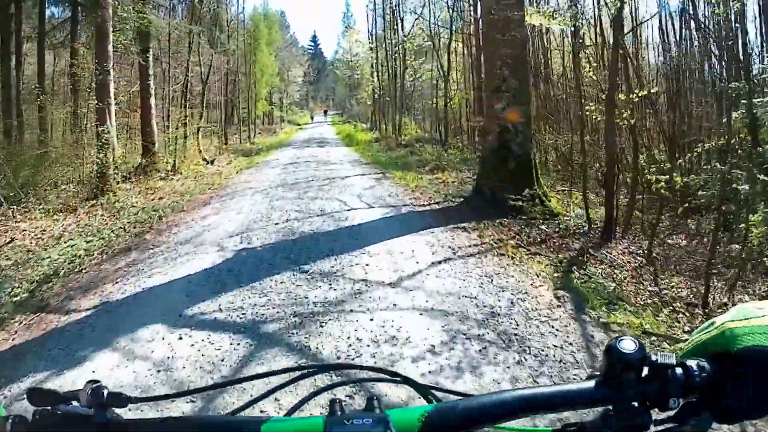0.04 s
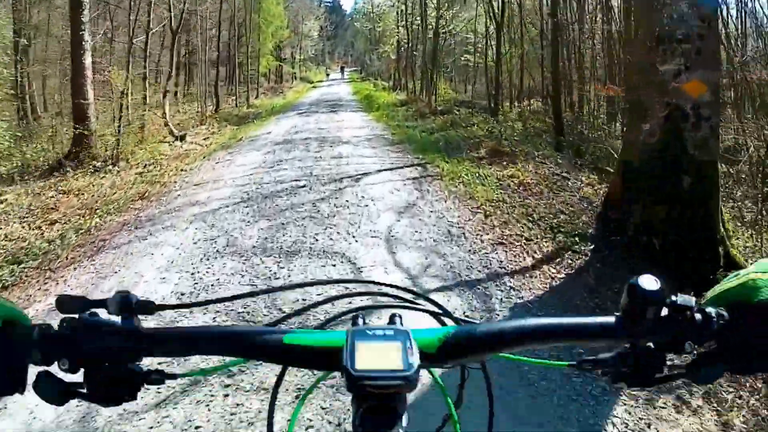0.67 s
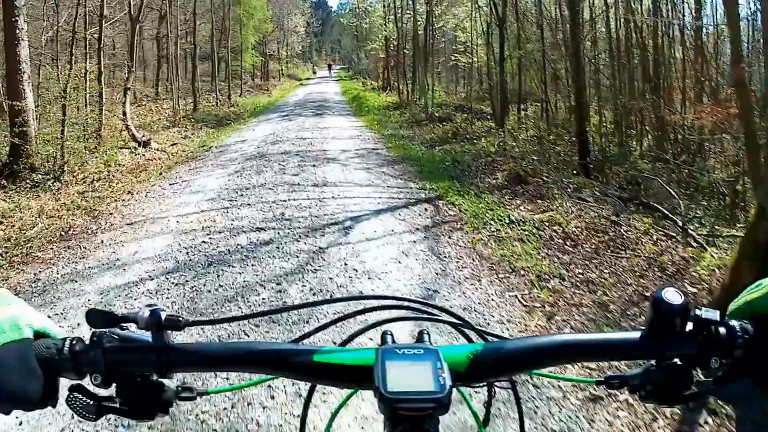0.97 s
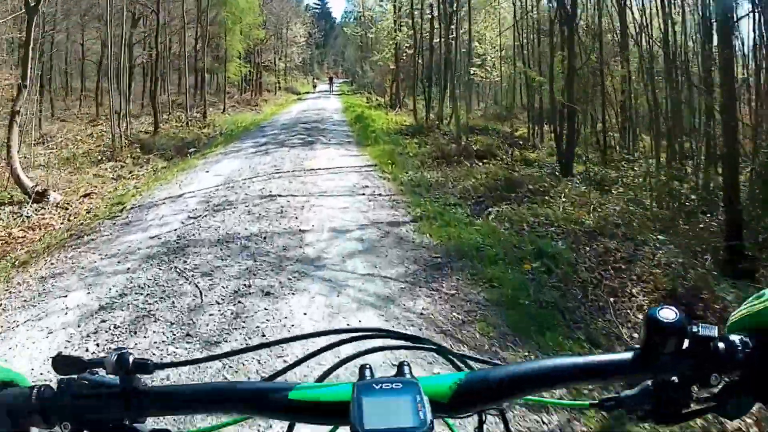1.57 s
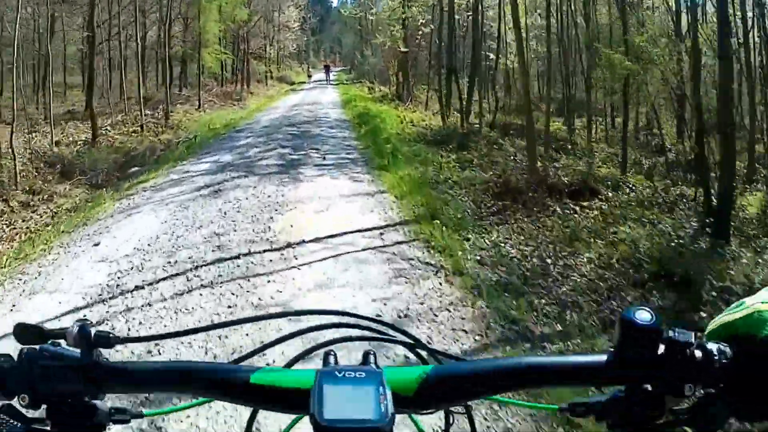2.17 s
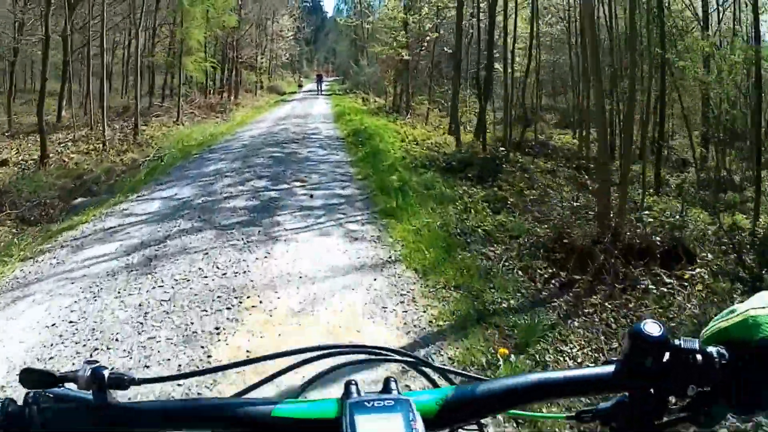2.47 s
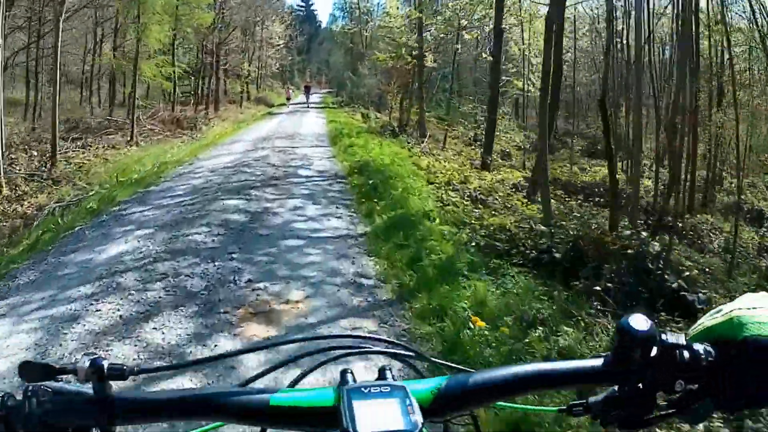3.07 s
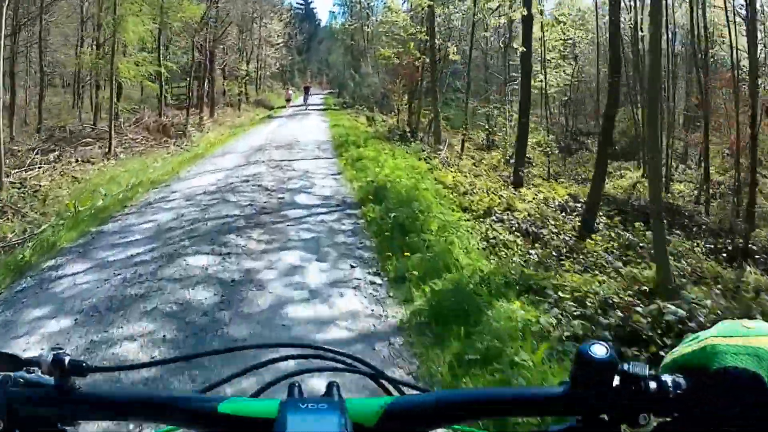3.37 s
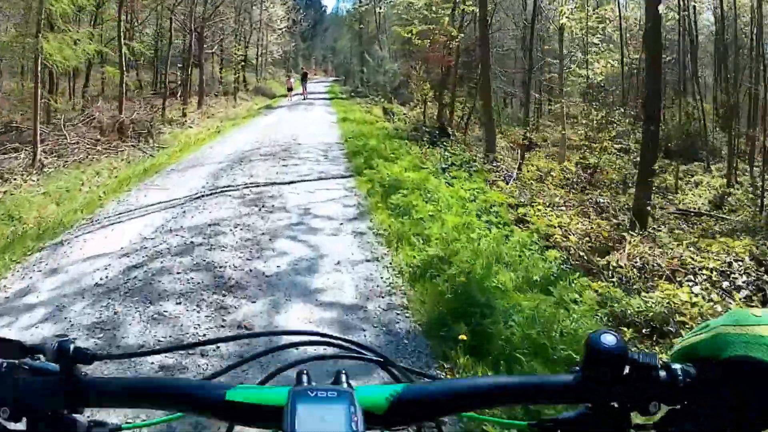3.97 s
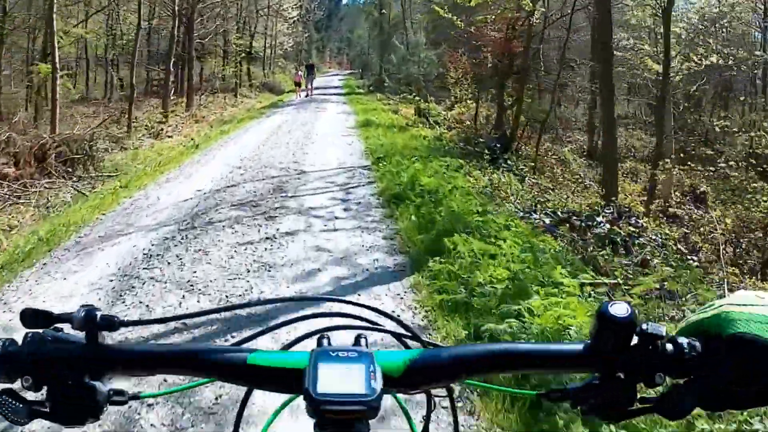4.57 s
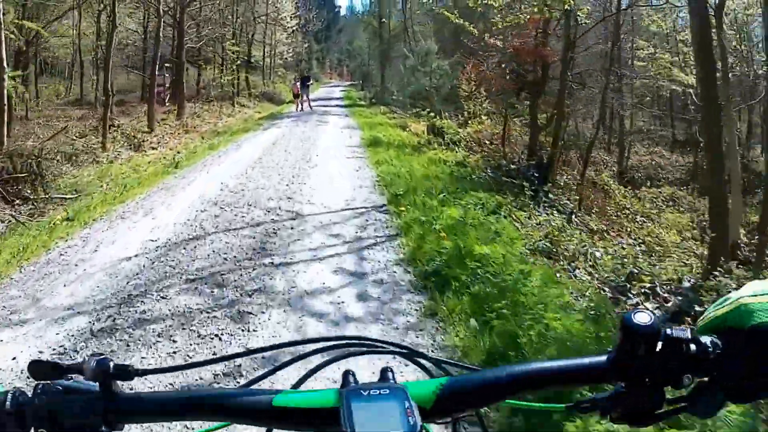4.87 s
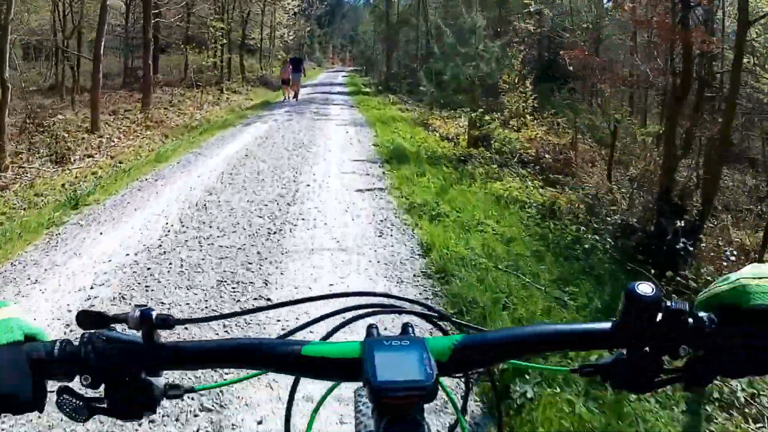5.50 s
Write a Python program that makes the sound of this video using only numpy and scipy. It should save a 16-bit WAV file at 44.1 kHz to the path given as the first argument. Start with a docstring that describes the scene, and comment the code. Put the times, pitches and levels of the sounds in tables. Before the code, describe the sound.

Muffled tyres crackle over loose stones as a bike clatters and thumps over bumps, under fluttering wind rumble.

```python
"""Mountain bike on gravel

Heard from a camera in a closed case on the rider. The tyres crunch over loose stones, most of all
in the first second, and drone faintly while wind buffets the case. Stones and bike parts knock,
the case rings with each blow, and bumps thump the frame. The case wall shuts out the treble;
one hard jolt overloads the microphone."""
import sys
import numpy as np
from scipy import signal
from scipy.fft import rfft, irfft
from scipy.io import wavfile
from scipy.ndimage import uniform_filter1d

SR = 44100
rng = np.random.default_rng(int(sys.argv[2]) if len(sys.argv) > 2 else 0)


def log_audio(samples):
    """Write samples as a 16-bit WAV file to the path given in sys.argv[1]."""
    # one column per channel
    frames = np.atleast_2d(samples).T
    # limit to full scale, then quantise
    limited = np.clip(frames, -1, 1)
    pcm = np.round(limited * 32767).astype(np.int16)
    wavfile.write(sys.argv[1], SR, pcm)


N = 244314
TIME = np.arange(N) / SR

# gravel under the tyres, loose at first, then packed: (time [s], crunch [dB], crackle [dB])
GRAVEL_BED = [(0.0, -28.5, -40.5), (0.43, -31, -38.5), (0.88, -31, -42), (1.19, -37, -43),
              (1.46, -34.5, -41.5), (2.48, -38, -45), (2.92, -37, -43), (3.95, -35.5, -43.5),
              (4.18, -34.5, -42), (4.46, -35.5, -45.5), (5.01, -37, -42.5), (5.54, -34, -40.5)]
# ring of the camera case and its mount: (pitch [Hz], level [dB], t60 [s])
CASE_RING = [(475, -20, .06), (610, -14, .04), (780, -17.5, .07), (930, -24, .035), (1160, -20, .02),
             (1750, -33, .018), (2200, -29, .016), (2550, -29, .014)]
STONE_LOW_HZ, STONE_HIGH_HZ, STONE_RESONANCE_DB = 550, 2560, 1.5  # clack of the small stones


def amp(db):
    """Decibels to gain."""
    return 10 ** (np.asarray(db) / 20)


def unit(x):
    """Scales to rms 1."""
    return x / np.sqrt(np.mean(x ** 2) + 1e-20)


def curve(rows, column=1):
    """A table column as an envelope, joined by straight lines in time."""
    rows = np.asarray(rows)
    return np.interp(TIME, rows[:, 0], rows[:, column])


def add(mix, start_s, sound):
    """Mixes a sound in at its start time."""
    part = mix[max(round(start_s * SR), 0):][:len(sound)]
    part += sound[:len(part)]


def response(spectrum, treble_db=0, pitch_hz=1000, resonance_db=0, width_hz=240, size=4096):
    """Causal impulse response of a spectrum, with a treble shelf and one resonance."""
    hz = np.abs(np.fft.fftfreq(size, 1 / SR)) + 1
    point_hz, point_db = np.transpose(spectrum)
    db = np.interp(np.log(hz), np.log(point_hz), point_db)
    db += treble_db * np.interp(hz, [700, 2200], [0, 1])
    db += resonance_db / (1 + (2 * (hz - pitch_hz) / width_hz) ** 2)
    db -= 40 * np.log2(np.clip(hz / point_hz[-1], 1, 2))  # roll off above the last point
    minimum_phase = np.exp(np.conj(signal.hilbert(np.log(amp(db)))))
    return np.fft.ifft(minimum_phase).real


def colour(x, spectrum):
    """Equalises x with a spectrum."""
    return signal.fftconvolve(x, response(spectrum))[:N]


def steady(x, size):
    """Rides the gain to hold rms near 1 over stretches of size samples."""
    power = uniform_filter1d(uniform_filter1d(x ** 2, size), size // 2)
    return x / np.sqrt(power + 1e-12)


def wander(hz):
    """Smooth random drift of rms 1, moving at rates up to about hz."""
    bin_hz = np.fft.rfftfreq(N, 1 / SR)
    return unit(irfft(rfft(rng.standard_normal(N)) / (1 + (bin_hz / hz) ** 4), N))


def grains(per_s, spread_db, limit):
    """Random clicks of either sign: many small, a few large."""
    sizes = amp(spread_db * np.minimum(rng.exponential(1, N), limit))
    return unit(sizes * rng.choice([-1, 1], N) * (rng.random(N) < per_s / SR))


def pebbles(low_hz, high_hz, decay_cycles, per_s, spread_db=1.5, count=18):
    """Stones of many sizes, each size clicking at random with its own brief pitch."""
    out, t = np.zeros(N), np.arange(SR // 25) / SR
    for hz in np.geomspace(low_hz, high_hz, count):
        clack = np.sin(2 * np.pi * hz * t) * np.exp(-hz * t / decay_cycles)
        clicks = grains(per_s / count, spread_db, limit=4.8)
        out += np.sqrt(hz) * unit(signal.oaconvolve(clicks, clack)[:N])
    return unit(out)


def patchy(x, depth_db=2.1):
    """The mix of stone sizes keeps changing: narrow bands swell and fade, each on its own."""
    bands = signal.stft(x, nperseg=512, noverlap=384)[2]
    swell = uniform_filter1d(rng.standard_normal(bands.shape), size=3, axis=0)  # smooth in pitch
    swell = uniform_filter1d(swell, size=16, axis=1)  # and in time
    return signal.istft(bands * amp(depth_db * unit(swell)), nperseg=512, noverlap=384)[1][:N]


def gravel(crunch_db=1, crackle_db=-3, clump_db=1.1, snap_share=0.82):
    """Tyres shift gravel in clumps of bursts: stones clack low, grit ticks high, both snap dryly."""
    # coarse stones grinding together: (frequency [Hz], level [dB])
    crunch_eq = [(100, -13), (280, -3.5), (480, -4.5), (600, -0.5), (740, 0.5), (950, -2), (1100, -8),
                 (1250, -6.5), (1550, -16), (2000, -40), (3000, -40)]
    # fine grit snapping: (frequency [Hz], level [dB])
    crackle_eq = [(500, -11.5), (1200, 0), (1700, 1.5), (2250, -0.5), (2480, -6.5), (2650, -12),
                  (3000, -20), (3200, -21.5), (3500, -36.5), (4000, -32.5)]
    bed_db = curve(GRAVEL_BED)
    burst_db = np.interp(bed_db, [-36, -30], [.5, 1.9])  # loose gravel slips in deeper bursts
    clumps = amp(clump_db * wander(hz=30) + burst_db * wander(hz=130))
    snaps = np.sqrt(snap_share) * grains(per_s=2100, spread_db=3.9, limit=4)
    coarse = np.sqrt(1 - snap_share) * pebbles(276, 1742, decay_cycles=3.17, per_s=2600)
    fine = np.sqrt(1 - snap_share) * pebbles(948, 3990, decay_cycles=3.2, per_s=1300)
    crunch = steady(colour((coarse + snaps) * clumps, crunch_eq), size=4500)
    crackle = steady(colour((fine + snaps) * clumps, crackle_eq), size=4500)
    crunch *= amp(bed_db + crunch_db)
    crackle *= amp(curve(GRAVEL_BED, column=2) + crackle_db)
    return patchy(crunch + crackle)


def tyre_drone(pitch_hz=254, width_hz=26, waver=.03):
    """The road shakes one low tyre resonance: a blurred tone that wavers as the load shifts."""
    # swells on rough patches: (time [s], level [dB])
    swells = [(0, -45), (0.17, -35.5), (0.33, -40.5), (0.7, -47.5), (1.14, -43.5), (1.45, -48),
              (1.92, -40.5), (2.16, -37), (2.28, -52), (2.48, -34.5), (2.63, -42), (3.24, -42),
              (3.58, -40.5), (3.79, -34), (4.0, -42.5), (4.46, -42), (4.9, -42), (5.21, -39), (5.54, -41.5)]
    hz = np.fft.fftfreq(N, 1 / SR)
    road = rng.standard_normal(N) + 1j * rng.standard_normal(N)
    shake = np.fft.ifft(np.fft.fft(road) / (1 + (hz / (width_hz / 2)) ** 4))
    cycles = np.cumsum(pitch_hz * (1 + waver * wander(hz=6))) / SR
    tone = (shake * np.exp(2j * np.pi * cycles)).real
    return steady(tone, size=9000) * amp(curve(swells))


def wind(flutter_db=-4, lumps_db=3, flicker_db=1):
    """Eddies push on the case: large ones make a lumpy rumble, small ones flutter above it."""
    # bed of airflow over the case: (time [s], level [dB])
    airflow = [(0, -31.5), (0.33, -37.5), (0.5, -31), (1.2, -27), (1.4, -33.5), (2.22, -32.5),
               (2.42, -29.5), (3.3, -29), (3.55, -29), (4.3, -28), (4.95, -25.5), (5.2, -29.5),
               (5.54, -26.5)]
    # gusts on top of it: (centre [s], length [s], rumble [dB], flutter [dB])
    gusts = [(0.546, 0.2, -25, -29), (0.786, 0.083, -23, -45.5), (1.18, 0.12, -31, -35),
             (2.049, 0.3, -28, -30.5), (2.532, 0.097, -25, -39), (3.222, 0.19, -25.5, -54.5),
             (3.365, 0.28, -30, -32.5), (4.365, 0.12, -23.5, -37), (4.575, 0.074, -25.5, -30),
             (4.86, 0.17, -28.5, -38), (5.533, 0.14, -28, -30.5)]
    # large eddies: (frequency [Hz], level [dB])
    rumble_eq = [(2, -53), (11, -0.5), (25, 5.5), (50, 1), (80, -6), (120, -17), (250, -52.5)]
    # small eddies: (frequency [Hz], level [dB])
    flutter_eq = [(30, -23), (70, -4.5), (100, -1), (140, -2), (190, -8.5), (310, -10.5), (450, -15),
                  (800, -26.5), (2000, -45)]
    large, small = rng.standard_normal((2, N))
    air_db = curve(airflow)
    rumble_power = amp(air_db + lumps_db * wander(hz=11)) ** 2
    flutter_power = amp(air_db + flutter_db + flicker_db * wander(hz=9.9)) ** 2
    for centre_s, length_s, low_db, high_db in gusts:
        arch = np.cos(np.pi * np.clip((TIME - centre_s) / length_s, -.5, .5))
        rumble_power += (amp(low_db) * arch) ** 2
        flutter_power += (amp(high_db) * arch) ** 2
    rumble = steady(colour(large, rumble_eq), size=3600) * np.sqrt(rumble_power)
    flutter = steady(colour(small, flutter_eq), size=2600) * np.sqrt(flutter_power)
    return rumble + flutter


def case_ring(landing, detune=0.025, place_db=3.5):
    """The case rings after a blow; where it lands decides which modes speak."""
    t = np.arange(SR // 8) / SR
    hz, db, t60 = np.transpose(CASE_RING)[:, :, None]
    pitch_draw, level_draw = landing[:, :, None]
    decays = amp(db + place_db * level_draw - 60 * t / t60)
    modes = decays * np.sin(2 * np.pi * hz * (1 + detune * pitch_draw) * t)
    contact = np.hanning(24)  # the contact time softens the attack
    return np.convolve(modes.sum(0), contact / contact.sum())


def knock(peak_db, treble_db, ring_db, pitch_hz, resonance_db, landing):
    """One pitched clack, then the ring of the case; a short, hard contact has more treble."""
    # body of the clack: (frequency [Hz], level [dB])
    clack_eq = [(60, -12.5), (300, -18), (600, -10.5), (850, -2), (1200, -0.5), (1600, -7), (2250, -7.5),
                (2700, -21.5), (3300, -29), (3900, -70)]
    clack = -response(clack_eq, treble_db, pitch_hz, resonance_db)
    sound = amp(ring_db) * case_ring(landing)
    add(sound, 0, clack / np.abs(signal.hilbert(clack)).max())
    return amp(peak_db) * sound


def knocks(spray_count=4, spray_s=0.022, spray_db=-13):
    """Clacks that stand out, most from stones and rattling parts, each trailed by a fine spray."""
    # accents: (time [s], clack peak [dB], treble [dB], case ring against the clack [dB],
    # pitch [Hz], resonance [dB]); the one at 0.896 s is a faint, brief high ping near 2.9 kHz
    accents = [(0.0312, -25, 7, -12, 2000, 0), (0.0807, -18.5, -32, -4, 700, 26.5),
               (0.0871, -20, -11, 7, 1640, 20.5), (0.1174, -18.5, -14, -6, 2250, 8),
               (0.1412, -9, -21.5, 0, 613, 21.5), (0.1534, -13, -11.5, -10, 990, 7),
               (0.1923, -8.5, -1, 5, 615, 22), (0.226, -19.5, 12, -11, 2220, 9.5),
               (0.2293, -14, -25.5, 5, 1114, 4), (0.2986, -18.5, -2, -10, 1900, 7),
               (0.3571, -16, -2, -13.5, 550, 20), (0.397, -15, 8, -11, 2250, 5),
               (0.4192, -12, -18.5, -1, 1100, -6), (0.4404, -17, -6, -6, 1800, 7.5),
               (0.4607, -18.5, -4, -8, 1300, 11), (0.4765, -21, -1, -11, 1300, 4),
               (0.4833, -24, -11, -4, 1100, 3), (0.5022, -12, -8, -12, 990, 9),
               (0.5522, -8.5, -12, 1, 636, 10.5), (0.5658, -15, -12, -10, 1660, 9),
               (0.5847, -16.5, -4, -10, 1260, 11), (0.5942, -14.5, -13, -4, 2150, 9.5),
               (0.6022, -11.5, 4.5, 2, 1820, 4), (0.6104, -13, -9, -14, 950, 8),
               (0.693, -13.5, -9.5, -9, 1210, 3), (0.7597, -18, -20, 0, 1200, 8),
               (0.7718, -16, -10, -3, 1400, 4), (0.7808, -17.5, -7, 0, 1260, 1.5),
               (0.7935, -19, -6, -5, 950, 0), (0.896, -18.5, -13, -11, 2900, 23),
               (0.9228, -12, -15, 5, 1270, 5), (0.9386, -11.5, -22, -11, 1005, -2),
               (0.9636, 1.5, -16, 0, 595, 16), (0.9692, -3, -18, -14.5, 880, 0),
               (1.043, -22, -4, -10.5, 523, 13), (1.1708, -19.5, -19, -7, 1040, 8),
               (1.1930, -18.5, -17, -9, 930, 9), (1.1974, -13.5, 0, 7.5, 760, 12),
               (1.2266, -20.5, -5, -8, 1700, 1), (1.3413, -16, -8, 8, 2250, 9),
               (1.4559, -25, 9, 11, 2280, 6), (1.4631, -28, -11, 1, 1100, 4),
               (1.6513, -24.5, 20, 8, 2630, 5), (1.6573, -24, -9, -8, 1210, 1),
               (1.8959, -25.5, 2, -10.5, 1780, 7), (1.971, -24.5, 22, -15, 2200, 2),
               (1.988, -14, -1, 2.5, 1570, 7.5), (2.0564, -17, 1, -9, 1090, 10),
               (2.1794, -21.5, -14, -3, 1100, 6), (2.1991, -30, 10, -2, 1900, 6),
               (2.2286, -27, -18, 0, 1280, 2), (2.3822, -17, -6, -10, 1680, 2),
               (2.5942, -28.5, 14, -15, 2100, -1), (2.8145, -21.5, -2, -6, 1210, 0),
               (2.8682, -16.5, 5.5, -7, 1550, 8), (2.9512, -21, 9, -7, 2110, 8),
               (2.9723, -19, 6, 5, 775, 19), (2.9898, -18.5, -11, 0, 1140, 11),
               (3.0069, -25, -6, -6, 1500, 6), (3.1663, -21, 3, 9, 2250, 0), (3.1813, -23, -4, -2, 1300, 1),
               (3.2226, -17.5, -5, -10, 2320, 10.5), (3.3326, -23, 12, -6, 1430, 13.5),
               (3.5924, -22, -5, -5, 1410, -5), (3.6742, -23.5, 3.5, 3, 1900, 7),
               (3.6831, -23, 6, -5, 1890, 1), (3.7078, -21, 7, 1, 1535, 0), (4.0456, -24, -6, -5, 1200, 7),
               (4.1269, -19.5, -9, -7.5, 1400, 4), (4.1806, -21, -1, -8, 2580, 1.5),
               (4.2306, -27.5, -3, -7.5, 2140, 16), (4.2787, -24, -13.5, -14, 1010, 13),
               (4.303, -16.5, -10, -11.5, 1490, -1), (4.3137, -23, -6, -8, 1406, 4.5),
               (4.358, -8, -7, 1, 2500, 11.5), (4.3728, -27, 2, -13, 1900, 3),
               (4.4321, -15.5, -6.5, -13, 1800, 4), (4.5038, -23.5, -14, -10, 1150, 7),
               (4.5943, -21.5, -9, -5, 710, 12), (4.6093, -18, -3, -6.5, 1350, 11),
               (4.7741, -15, -19, 1, 1320, 11), (4.8787, -19, -8, -8, 1810, 9),
               (5.0298, -23.5, -5, -5, 1300, 9), (5.117, -23.5, 10, -11, 2040, 14),
               (5.1375, -23, -4, -2, 1150, 4.5), (5.1465, -25, 5, -2, 2540, 12),
               (5.1946, -17, -6.5, -15, 1850, 8), (5.2661, -6.5, -4.5, -0.5, 710, 14),
               (5.332, -15, -27, 5, 500, 9), (5.3412, -18, 14, -2, 2340, 6),
               (5.362, -15.5, -4, 1.5, 845, 2), (5.506, -18.5, 3, -14, 1820, 7)]
    out = np.zeros(N)
    landings = rng.standard_normal((len(accents), 2, len(CASE_RING)))
    sprays = rng.random((len(accents), spray_count, 2))
    for (time_s, peak_db, *timbre), landing, spray in zip(accents, landings, sprays):
        add(out, time_s - .0003, knock(peak_db, *timbre, landing))
        small_db = min(peak_db, -11.5) + spray_db  # the spray follows the accent up to a ceiling
        for lag, height in spray:
            pitch_hz = STONE_LOW_HZ * (STONE_HIGH_HZ / STONE_LOW_HZ) ** height
            small = knock(small_db, treble_db=3.5, ring_db=-4, pitch_hz=pitch_hz,
                          resonance_db=STONE_RESONANCE_DB, landing=landing)
            add(out, time_s + lag * spray_s, small)
    return out


def flung_stones(candidates=220, base_per_s=3, base_db=-40, doubling_db=2.5,
                 bounce_s=0.0074, bounce_db=1.5):
    """Small stones hit the bike at random and bounce once, more often and harder on loose gravel."""
    out, bed_db = np.zeros(N), curve(GRAVEL_BED)
    pitches = STONE_LOW_HZ * (STONE_HIGH_HZ / STONE_LOW_HZ) ** rng.random(candidates)
    onsets = rng.integers(0, N, candidates)
    dice = rng.random(candidates)
    delays = bounce_s * (.5 + rng.random(candidates))
    variations = rng.uniform(-0.82, 1, (candidates, 3)) * np.sqrt(3)
    landings = rng.standard_normal((candidates, 2, len(CASE_RING)))
    stones = zip(onsets, dice, delays, variations, pitches, landings)
    for onset, roll, delay_s, variation, pitch_hz, landing in stones:
        per_s = base_per_s * 2 ** ((bed_db[onset] - base_db) / doubling_db)
        if roll < per_s * N / SR / candidates:
            above_bed_db, treble_db, ring_db = np.array([2.5, 3, 0.5]) + variation * [5, 2, -5]
            peak_db = bed_db[onset] + above_bed_db
            hit = knock(peak_db, treble_db, ring_db, pitch_hz, STONE_RESONANCE_DB, landing)
            add(out, onset / SR, hit)
            add(out, onset / SR + delay_s, -amp(bounce_db) * hit)
    return out


def thumps(attack_cycles=0.48):
    """Bumps shake the frame and the camera mount: a dull push that dies in a cycle or two."""
    # bumps in the road: (time [s], envelope peak [dB], pitch [Hz])
    bumps = [(0.468, -18, 181), (0.5205, -17, 165), (0.536, -14, 65.3), (0.591, -23, 245),
             (0.644, -26, 68.4), (0.744, -20.5, 200), (0.807, -18.5, 72), (1.183, -29, 135),
             (1.222, -31, 100), (1.998, -17, 65), (2.068, -21, 125), (2.482, -25, 224), (2.506, -17, 62.5),
             (2.828, -19.5, 238), (3.166, -25, 70), (3.34, -23.5, 150), (3.385, -20, 265),
             (3.776, -20.5, 249), (4.021, -18.5, 207), (4.237, -14.5, 66), (4.32, -22.5, 309),
             (4.356, -17, 62), (4.401, -21.5, 213), (4.577, -16, 130), (4.824, -20, 62),
             (4.884, -24.5, 142), (5.498, -19, 61)]
    out, t = np.zeros(N), np.arange(SR // 8) / SR
    for time_s, peak_db, hz in bumps:
        age = hz * t / attack_cycles
        envelope = amp(peak_db) * age * np.exp(1 - age)
        add(out, time_s, -envelope * np.sin(2 * np.pi * hz * t))
    return out


def jolt(time_s=0.9638):
    """One hard jolt cracks through the bike, which rings on for a moment."""
    # modes of the bike that only this jolt wakes: (pitch [Hz], level [dB], t60 [s])
    bike_modes = [(255, -29, .15), (400, -18, .025), (482, -27, .2), (790, -12.5, .1), (1220, -17, .04),
                  (1405, -24, .04), (2530, -19, .012), (2950, -26, .008), (3570, -27, .006)]
    out, t = np.zeros(N), np.arange(SR // 4) / SR
    hz, db, t60 = np.transpose(bike_modes)[:, :, None]
    modes = amp(db - 60 * t / t60) * np.sin(2 * np.pi * hz * t)
    add(out, time_s, -modes.sum(0))
    return out


def scene():
    """Gravel, impacts, tyre drone and wind, mixed in mono."""
    return (gravel() + knocks() + jolt() + flung_stones() + thumps() + tyre_drone() + wind())[None]


def low_pass(x, hz):
    """Steep low-pass without delay."""
    return signal.oaconvolve(x, signal.firwin(255, hz, window=("kaiser", 8), fs=SR), "same")


def record(dry):
    """The case wall muffles everything; the hardest jolt overloads the microphone in a bright crack."""
    wall_hz, ceiling, band_limit_hz = 3950, .71, 16000
    muffled = low_pass(dry[0], wall_hz)
    clipped = muffled / (1 + (muffled / ceiling) ** 30) ** (1 / 30)
    end_fades = signal.windows.tukey(N, .003)
    return (low_pass(clipped, band_limit_hz) * end_fades)[None]


dry = scene()
out = record(dry)
log_audio(out)
```